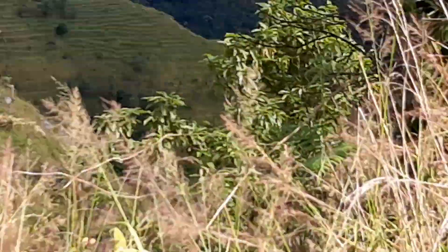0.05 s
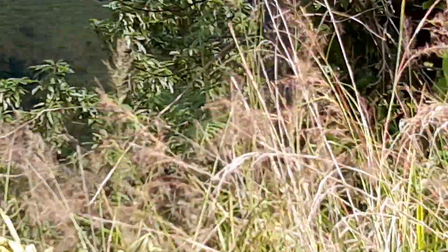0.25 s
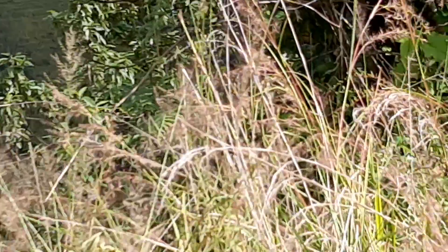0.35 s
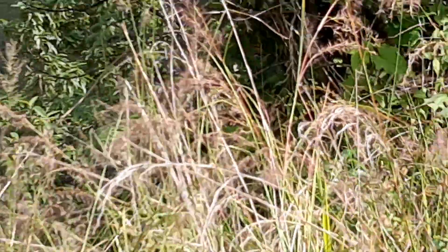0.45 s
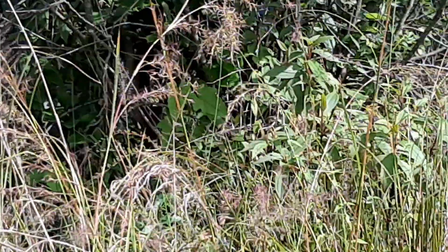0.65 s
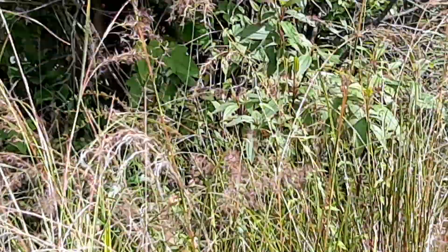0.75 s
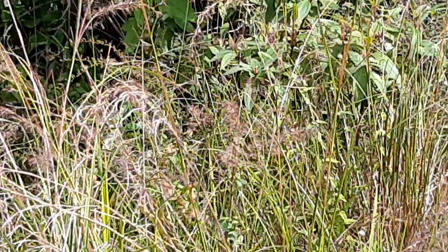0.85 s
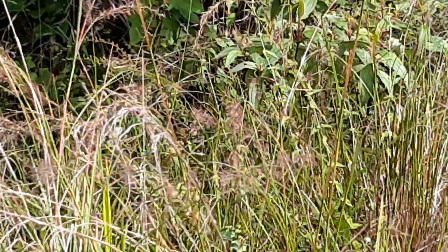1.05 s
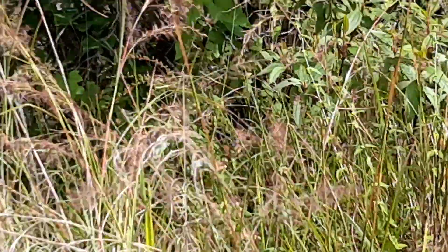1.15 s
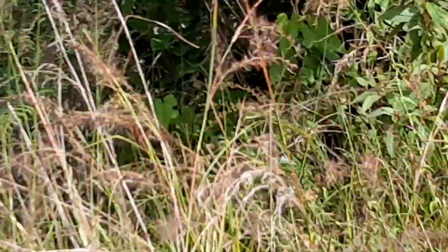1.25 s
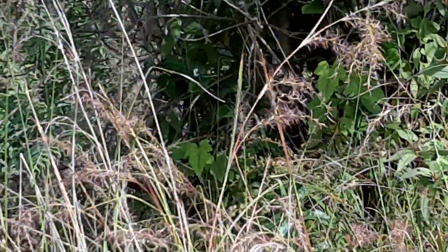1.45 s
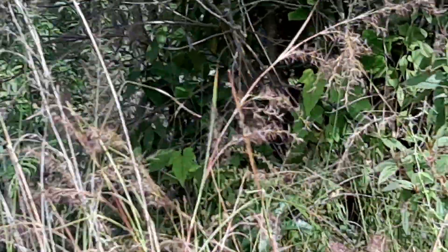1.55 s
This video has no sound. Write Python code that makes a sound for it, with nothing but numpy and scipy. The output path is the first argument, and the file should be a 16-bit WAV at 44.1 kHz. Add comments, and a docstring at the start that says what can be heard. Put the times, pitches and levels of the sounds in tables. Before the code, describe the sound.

Tall dry grass swishes past twice, mostly on the right, as a stalk snaps over faint low hum.

```python
"""Walking through tall dry grass

Someone moves through tall dry grass outdoors. Twice the stalks sweep past, mostly on the right, as grainy noise
swelling in a bright seed-head layer and a lower blade layer. One stem snaps: noise cracks over ringing modes.
Other stalks tick as short band-passed bursts, and soft clicks ring a hollow body, like handling close by.
A low steady hum of sines, perhaps a far engine, lies with a faint rumble of wind made of coloured noise."""
import sys
import numpy as np
from scipy import signal
from scipy.fft import rfft, irfft
from scipy.io import wavfile

SR = 44100
rng = np.random.default_rng(int(sys.argv[2]) if len(sys.argv) > 2 else 0)


def file_out(sig):
    """Save sig as 16-bit WAV at sys.argv[1]."""
    # one column per channel
    cols = np.atleast_2d(sig).T
    # limit, then scale
    lim = np.clip(cols, -1, 1)
    pcm = np.round(lim * 32767).astype(np.int16)
    wavfile.write(sys.argv[1], SR, pcm)


N = 70560
T = np.arange(N) / SR
HZ = np.maximum(np.arange(N // 2 + 1) * SR / N, 1)
CUTOFF_HZ = 15750

# Seed heads brushing past: (time [s], level before the layer trim [dB], right minus left before shading [dB])
SEED_HEAD_SWEEPS = [(0, -56, -1), (.1, -59.5, 0), (.25, -54.5, -0.5), (.31, -45, 2.5), (.39, -40.5, 4.5),
                    (.47, -33, 7.5), (.57, -42, 4.5), (.615, -46.5, 2), (.69, -53.5, -1), (.82, -56, 0.5),
                    (.98, -60, 8), (1.09, -65, 11), (1.15, -51.5, 9), (1.29, -40.5, 11), (1.39, -38, 9),
                    (1.445, -54.5, 11), (1.485, -62, 19), (1.6, -65, 7)]
# Blades rubbing on each other: (time [s], level before the layer trim [dB], right minus left before shading [dB])
BLADE_RUBS = [(0, -56, 9), (.11, -62.5, 7.5), (.25, -54.5, 4), (.3, -48, 12), (.39, -45.5, 6),
              (.47, -40, 7.5), (.57, -42.5, 8.5), (.65, -49.5, 5), (.72, -50, 3), (.81, -53, 6.5),
              (.88, -53.5, 3), (.94, -55.5, 10), (1.0, -53.5, 5.5), (1.09, -60, 6.5), (1.15, -52.5, 6.5),
              (1.37, -45.5, 17), (1.44, -50, 13), (1.49, -62.5, 8.5), (1.6, -59.5, 15)]
# Relative colour of the seed heads, the blades and the wind: (frequency [Hz], density per Hz [dB])
SEED_HEAD_COLOUR = [(3000, -24), (5800, -8.5), (7200, -7), (8400, -7.5), (9500, -2.5), (11000, 0.5),
                    (12500, 0), (15500, -2.5)]
BLADE_COLOUR = [(250, -5.5), (450, -3), (800, -7), (1100, -2.5), (1500, 1.5), (2100, 2), (3000, 2),
                (4300, 2.5), (5500, -3), (9000, -37)]
WIND_COLOUR = [(20, -46), (35, -17), (60, -3), (85, 6), (115, 0.5), (220, -3), (300, -10), (500, -15.5),
               (900, -24), (2000, -40.5), (6000, -22.5), (15000, -17)]
# Left-right likeness of the grass and of the wind: (frequency [Hz], likeness [0-1])
GRASS_LIKENESS = [(300, 0.95), (1000, 0.51), (2500, 0.26), (5000, 0.06), (9000, 0.1), (15000, 0)]
WIND_LIKENESS = [(60, 0.89), (250, 0.63), (1000, 0.2), (4000, 0.067), (15000, .05)]
# The microphone favours one side at some pitches: (frequency [Hz], extra right minus left [dB])
SIDE_SHADE = [(1400, -5), (2100, 0), (3500, -2.5), (4700, -4), (5600, -14), (6400, -9.5), (7600, -1),
              (9000, 6.5), (11000, 4), (12800, 0), (15500, 2)]
# Wind rumble: (time [s], level before the low cut and pan [dB])
WIND_LEVEL = [(0, -56), (.5, -58.5), (.8, -52.5), (1.12, -56.5), (1.33, -50.5), (1.6, -60)]
# Hum tones: (frequency before wander [Hz], rms level before swell, waver and pan [dB])
HUM_TONES = [(47.2, -64), (70.8, -56.5), (83.3, -62), (94.4, -59), (118, -71.5), (141.6, -70), (165.6, -66),
             (250.4, -63.5)]
# Hum swell: (time [s], level change per octave above the lowest tone, before scaling [dB])
HUM_SWELL = [(0, -3), (.35, -2.5), (.7, -0.5), (1.35, 1), (1.6, -0.5)]
# Small stalks ticking: (time [s], peak before trim and pan [dB], centre [Hz], width [octaves],
# right minus left [dB])
STALK_TICKS = [(.1985, -32, 2940, 1.9, 9), (.2225, -39, 2900, 0.96, -20), (0.4845, -22, 10700, 0.33, 3),
               (.566, -24.5, 11500, 0.48, 7), (0.6266, -33, 1980, 1.5, -3), (.6332, -24.5, 1740, 2.3, 10),
               (.713, -32, 2200, 2.6, -3), (0.734, -34.5, 2900, 0.32, 12), (.8398, -31.5, 2420, 1.4, 13),
               (.8605, -25, 12000, 0.77, 8), (.861, -34.5, 2520, 1.8, 18), (.9725, -35.5, 1240, 0.92, 1.5),
               (1.373, -21, 9900, 1.14, 13), (1.384, -21.5, 10000, 3, 5), (1.4015, -24, 10800, .8, 14),
               (1.533, -38, 2830, 0.88, 27)]
# Soft contacts on the hollow body: (time [s], click strength before dulling [dB], low-pass cutoff [Hz])
KNOCK_CONTACTS = [(0.1999, -35.5, 1800), (0.2091, -36.5, 1500), (.2135, -40.5, 1540), (.2272, -43, 610),
                  (.555, -43, 450), (0.679, -45.5, 1200), (.7322, -43, 1100), (0.7397, -36.5, 340),
                  (.757, -40, 404), (0.838, -53, 900), (.972, -51.5, 1180), (1.471, -55.5, 1000),
                  (1.52, -57.5, 900)]
# Modes of the hollow body: (frequency [Hz], mean strength [dB], time to fall 60 dB [s])
KNOCK_MODES = [(375.6, -7, 0.29), (439.4, -3.5, 0.13), (528, -6, 0.073), (591, -3, 0.06),
               (655, -10.5, 0.088), (706, -11.5, 0.11), (900, -6.5, 0.022), (1150, -16, 0.054),
               (1483, -5.5, 0.051), (2300, -12, 0.078), (2570, -4, 0.078)]
# The stem breaks in stages: (time at left [s], strength [dB], right minus left [dB])
SNAP_STAGES = [(.6672, -17, -5), (.6685, -25, 5), (.6731, -30, 5)]
# Modes of the snapped stem: (frequency [Hz], strength within a stage [dB], time to fall 60 dB [s])
STEM_MODES = [(382, -20.5, 0.18), (768, -18.5, 0.12), (1180, -13, 0.052), (1400, -12.5, 0.031),
              (2060, -7.5, 0.024), (2780, -4.5, .022), (3333, 3, 0.018), (4065, -7, 0.017),
              (4830, -6, 0.0082), (5155, -10.5, 0.0086), (7370, -10.5, 0.0025)]

# Grass: layer trim, grain density, spread of grain sizes, share of smooth hiss [0-1]
BRUSH_TRIM_DB, BRUSH_GRAINS_PER_S, BRUSH_SPREAD_DB, BRUSH_SMOOTH = 2.5, 4300, 1, 0.46
RUB_TRIM_DB, RUB_GRAINS_PER_S, RUB_SPREAD_DB, RUB_SMOOTH = 1.5, 2300, 2.5, 0.74
# Hum: level waver, relative pitch wander, swell scale, phase spread between the sides
HUM_WAVER_DB, HUM_WANDER_SHARE, HUM_SWELL_SCALE, HUM_PHASE_RAD = 1.05, .004, 1, 0.14
WIND_LOW_CUT_HZ = 26
TICK_DECAY_S, TICK_TAIL_S, TICK_TAIL_DB = 0.00062, 0.0052, -6.5
TICK_TRIM_DB, TICK_LIKENESS = 2, 0.56
TICK_EDGE = 2.4  # the first click against the crackle after it
KNOCK_VARY_DB, KNOCK_LOW_CUT_HZ = 3.1, 364
SNAP_LAG_S, CRACK_DB, CRACK_DECAY_S, CRACK_LOW_CUT_HZ = 0.0003885, -4, 0.00051, 3470
SCATTER_DB, SCATTER_DECAY_S, SCATTER_LOW_HZ, SCATTER_HIGH_HZ = -10.5, 0.0084, 1100, 5900


def from_db(db):
    """Decibels to gain."""
    return 10 ** (np.asarray(db) / 20)


def rms_one(x):
    """Scale to an rms of 1."""
    return x / np.sqrt(np.mean(x ** 2) + 1e-20)


def in_time(rows):
    """Read the columns of a curve sample by sample."""
    times, *columns = np.transpose(rows)
    return [np.interp(T, times, column) for column in columns]


def at_hz(points, hz):
    """Read a table on a log-frequency axis."""
    table_hz, values = np.transpose(points)
    return np.interp(np.log(hz), np.log(table_hz), values)


def pan(side_db):
    """Left and right gains of constant power for a right-minus-left level."""
    gains = from_db(np.array([[-.5], [.5]]) * side_db)
    return gains / np.sqrt(np.mean(gains ** 2, axis=0))


def butter(x, hz, kind, order=2):
    """Causal Butterworth filter."""
    edges = np.clip(hz, 10, .47 * SR)
    return signal.sosfilt(signal.butter(order, edges, kind, fs=SR, output="sos"), x + 1e-18)


def drift(rate_hz):
    """Slow chance with a spread of 1: noise through two equal low-pass poles, one point per 40 samples."""
    pole = np.exp(-80 * np.pi * rate_hz / SR)
    noise = rng.standard_normal(N // 40 + 2002)
    slow = signal.lfilter([1], [1, -2 * pole, pole * pole], noise)[2000:]  # skip the filter's start
    return np.interp(np.arange(N) / 40, np.arange(len(slow)), rms_one(slow))


def click(s):
    """A unit click at a time."""
    return 1.0 * (np.arange(N) == int(s * SR))


def dying(s, decay_s):
    """Sudden start, exponential fall."""
    return (T >= s) * np.exp(-np.abs(T - s) / decay_s)


def ring(x, hz, t60):
    """A resonator: a unit click sets off a dying sine that starts from height 1."""
    radius = from_db(-60 / (t60 * SR))
    angle = 2 * np.pi * hz / SR
    return signal.lfilter([0, np.sin(angle)], [1, -2 * radius * np.cos(angle), radius * radius], x + 1e-18)


def stereo(pair, likeness):
    """Two unrelated signals become left and right with a given likeness."""
    alike = np.clip(likeness, -1, 1)
    middle = np.sqrt(1 + alike) * pair[0]
    sides = np.sqrt(1 - alike) * pair[1] * np.array([[1], [-1]])
    return middle + sides


def coloured(pair, colour, likeness, side_db, patchy_db):
    """Give two sources a colour and a stereo image; overlapping bands flicker on their own; rms 1."""
    image = stereo(rfft(pair), at_hz(likeness, HZ))
    spectrum = image * from_db(at_hz(colour, HZ)) * pan(side_db)
    centres = np.geomspace(60, 16000, 16)
    out = 0
    for weights in np.eye(len(centres)):
        window = np.interp(np.log(HZ), np.log(centres), weights) * (HZ < CUTOFF_HZ + 500)
        band = irfft(spectrum * window, N)
        out = out + from_db(patchy_db * drift(16.7)) * band
    return rms_one(out)


def friction(grains_per_s, spread_db, smooth):
    """Countless tiny slips of uneven size over a smooth hiss, mixed by power."""
    sizes = from_db(spread_db * np.minimum(rng.exponential(1, N), 6))
    grains = sizes * (rng.random(N) < grains_per_s / SR)
    share = np.clip(smooth, 0, 1)
    return np.sqrt(share + (1 - share) * rms_one(grains) ** 2) * rng.standard_normal((2, N))


def seed_heads():
    """The bright swish of dry seed heads, made of dense friction grains."""
    db, side_db = in_time(SEED_HEAD_SWEEPS)
    slips = friction(BRUSH_GRAINS_PER_S, BRUSH_SPREAD_DB, BRUSH_SMOOTH)
    swish = coloured(slips, SEED_HEAD_COLOUR, GRASS_LIKENESS, at_hz(SIDE_SHADE, HZ), patchy_db=1.9)
    return from_db(BRUSH_TRIM_DB + db) * pan(side_db) * swish


def blades():
    """The lower, papery rustle of the blades, made of sparser and more uneven grains over more hiss."""
    db, side_db = in_time(BLADE_RUBS)
    slips = friction(RUB_GRAINS_PER_S, RUB_SPREAD_DB, RUB_SMOOTH)
    rustle = coloured(slips, BLADE_COLOUR, GRASS_LIKENESS, at_hz(SIDE_SHADE, HZ), patchy_db=2.43)
    return from_db(RUB_TRIM_DB + db) * pan(side_db) * rustle


def hum():
    """Low sines waver in pitch and level; the swell deepens with each octave above the lowest."""
    (swell_db,) = in_time(HUM_SWELL)
    lowest_hz = HUM_TONES[0][0]
    out = 0
    for hz, db in HUM_TONES:
        cycles = np.cumsum(hz * (1 + HUM_WANDER_SHARE * drift(3.8))) / SR + rng.random()
        apart = HUM_PHASE_RAD / 2 * drift(3.5) * np.array([[1], [-1]])
        swelling = swell_db * HUM_SWELL_SCALE * np.log2(hz / lowest_hz)
        level = db + swelling + HUM_WAVER_DB * drift(1.8)
        # a sine peaks at root 2 times its rms
        out = out + np.sqrt(2) * from_db(level) * np.sin(2 * np.pi * cycles + apart)
    return pan(3.0) * out


def wind():
    """A soft rumble: coloured noise, more alike on both sides at low pitches."""
    (db,) = in_time(WIND_LEVEL)
    noise = rng.standard_normal((2, N))
    rumble = from_db(db) * coloured(noise, WIND_COLOUR, WIND_LIKENESS, side_db=0, patchy_db=0.1)
    return pan(3.0) * butter(rumble, WIND_LOW_CUT_HZ, "high")


def ticks():
    """A stalk gives way: a click and brief crackle in its own band, with a faint tail."""
    out = 0
    for s, db, hz, octaves, side_db in STALK_TICKS:
        shape = dying(s, TICK_DECAY_S) + from_db(TICK_TAIL_DB) * dying(s, TICK_TAIL_S)
        crackle = stereo(rng.standard_normal((2, N)), TICK_LIKENESS) * shape
        edge = TICK_EDGE * np.sqrt(TICK_DECAY_S * SR) * click(s)
        band_hz = hz * 2 ** (octaves * np.array([-.5, .5]))
        burst = butter(edge + crackle, band_hz, "band")
        out = out + from_db(TICK_TRIM_DB + db) * pan(side_db) * burst / np.abs(burst).max()
    return out


def knocks():
    """Soft contacts ring one hollow body; mode strengths vary with each contact and side."""
    contacts = np.array([from_db(db) * butter(click(s), hz, "low") for s, db, hz in KNOCK_CONTACTS])
    variation = rng.standard_normal((len(KNOCK_CONTACTS), len(KNOCK_MODES), 2))
    strengths = from_db(KNOCK_VARY_DB * variation)
    body = 0
    for k, (hz, db, t60) in enumerate(KNOCK_MODES):
        drive = strengths[:, k].T @ contacts  # left and right
        body = body + from_db(db) * ring(drive, hz, t60)
    return pan(4.0) * butter(body, KNOCK_LOW_CUT_HZ, "high", order=3)


def snap():
    """Each stage cracks, rings the stem and scatters off the stalks around; the right side hears it later."""
    out = 0
    for s, db, side_db in SNAP_STAGES:
        rings = 0
        for hz, level, t60 in STEM_MODES:
            rings = rings + from_db(level) * butter(ring(click(s), hz, t60), hz / 2, "high")
        crack_noise = rng.standard_normal((2, N)) * dying(s, CRACK_DECAY_S)
        crack = butter(crack_noise, CRACK_LOW_CUT_HZ, "high")
        scatter_noise = rng.standard_normal((2, N)) * dying(s, SCATTER_DECAY_S)
        scatter = butter(scatter_noise, [SCATTER_LOW_HZ, SCATTER_HIGH_HZ], "band")
        stage = rings + from_db(CRACK_DB) * crack + from_db(SCATTER_DB) * scatter
        out = out + from_db(db) * pan(side_db) * stage
    left, right = out
    return np.array([left, np.interp(T - SNAP_LAG_S, T, right)])


def scene():
    """All sources together."""
    return seed_heads() + blades() + hum() + wind() + ticks() + knocks() + snap()


def record(dry):
    """The top is cut steeply by an elliptic low-pass."""
    return signal.sosfilt(signal.ellip(12, .2, 70, CUTOFF_HZ, fs=SR, output="sos"), dry)


dry = scene()
out = record(dry)
file_out(out)
```